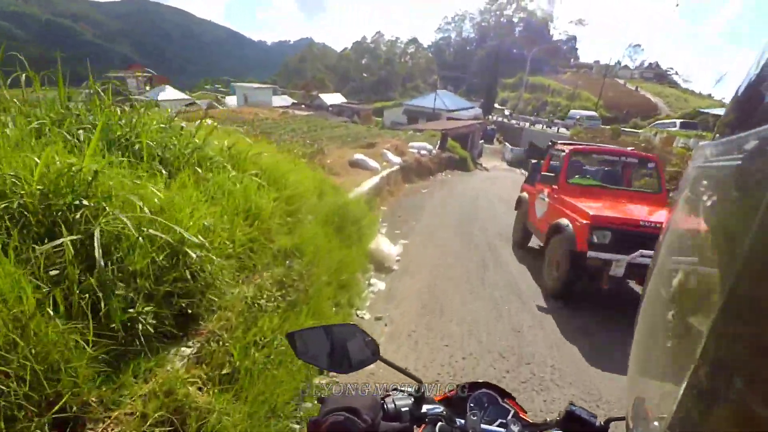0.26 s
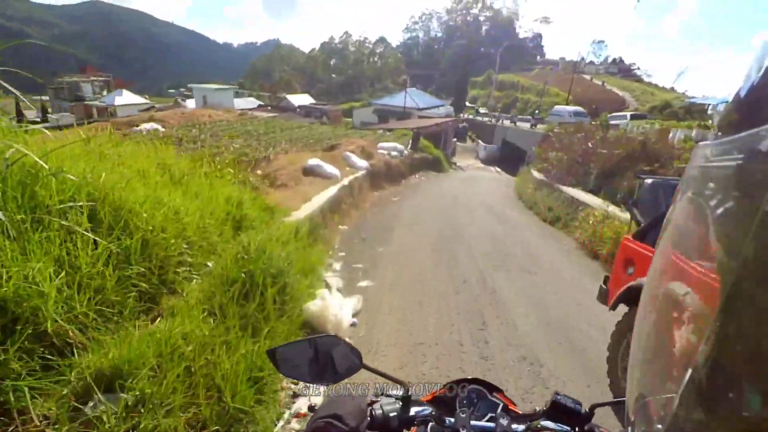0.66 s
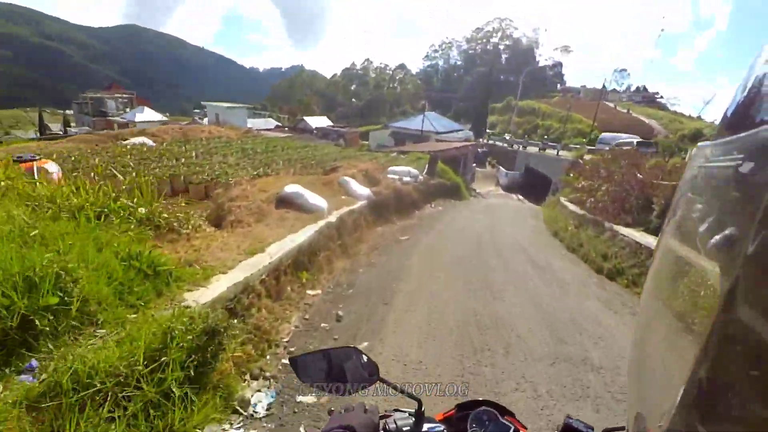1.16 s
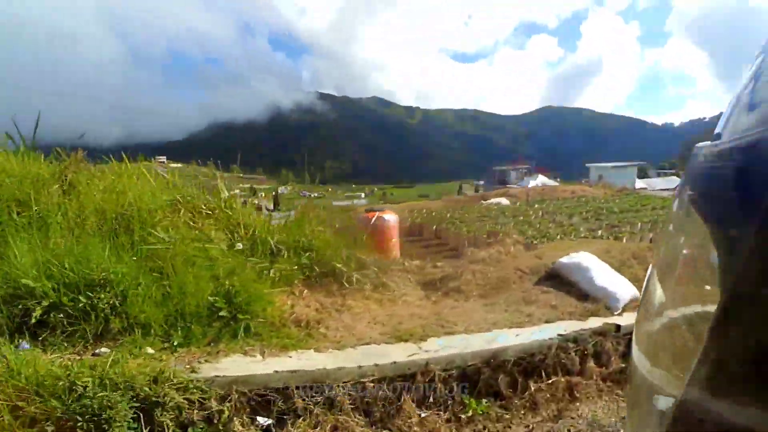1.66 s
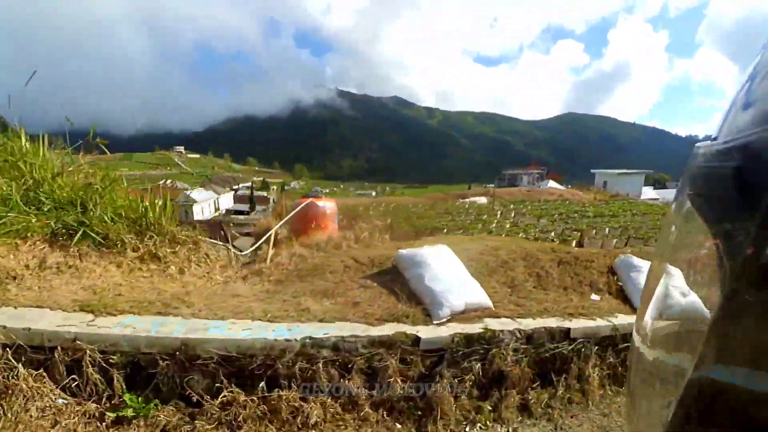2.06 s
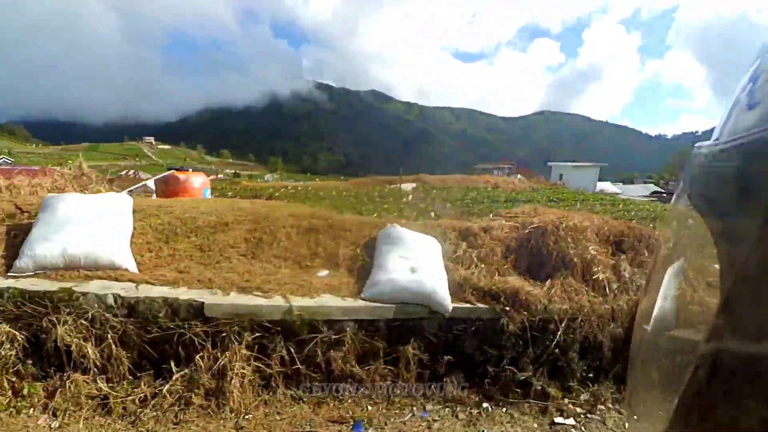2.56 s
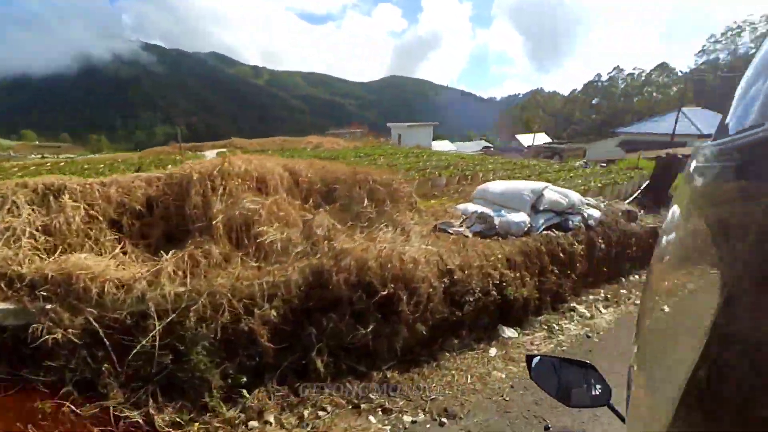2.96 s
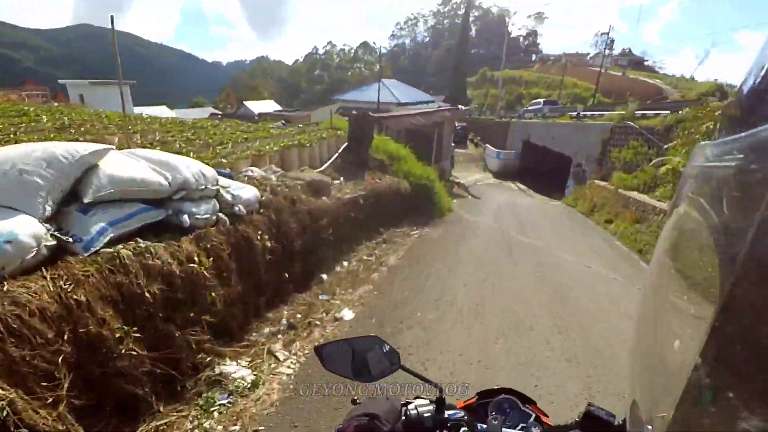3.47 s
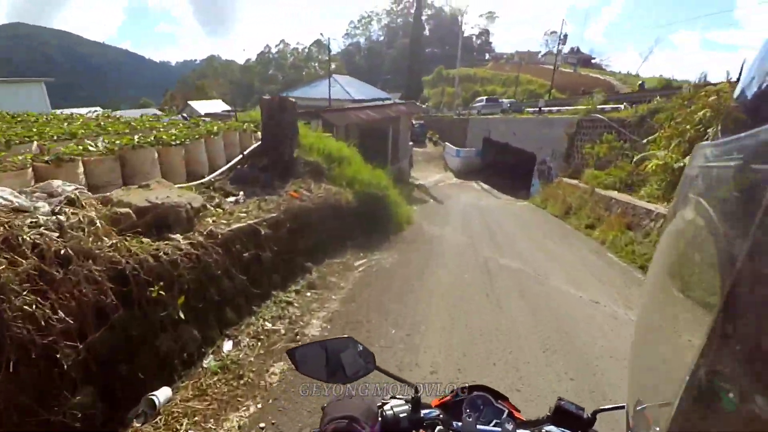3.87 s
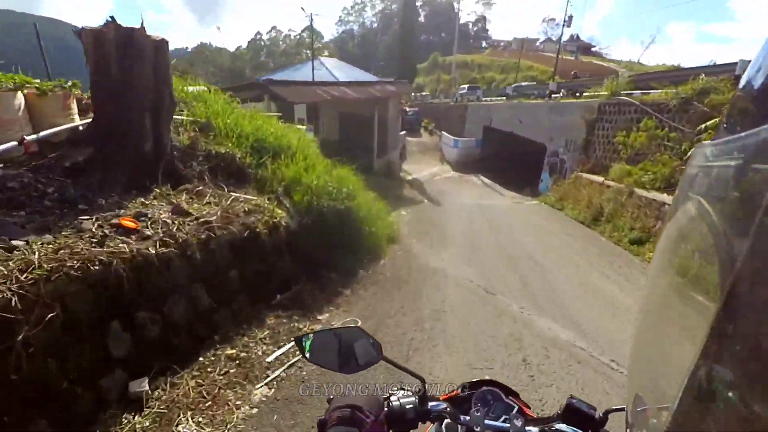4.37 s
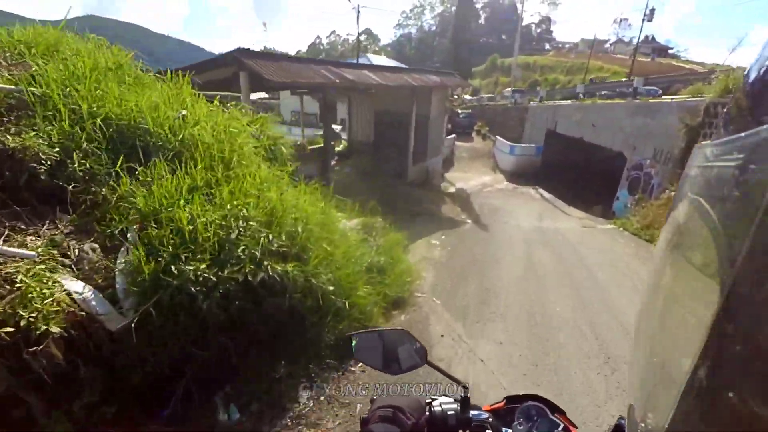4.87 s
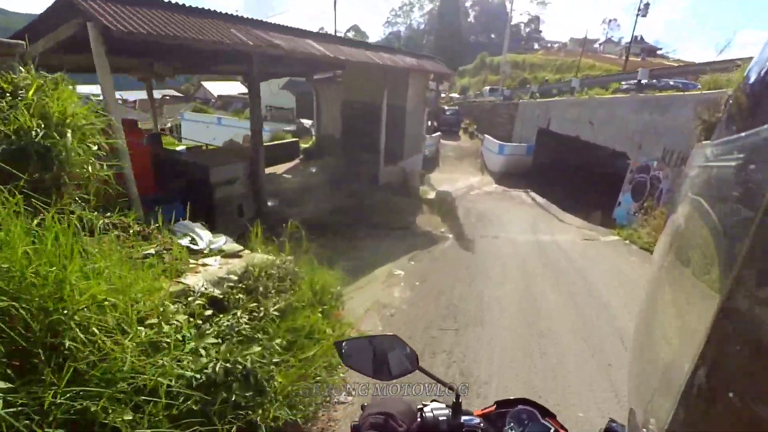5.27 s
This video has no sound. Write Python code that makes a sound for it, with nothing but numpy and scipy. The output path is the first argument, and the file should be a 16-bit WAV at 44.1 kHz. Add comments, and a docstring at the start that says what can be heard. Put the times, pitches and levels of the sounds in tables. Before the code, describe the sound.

From a rider's helmet: low single-cylinder putter, an off-road car rasping and hissing by within a second, then a fading engine drone and wind.

```python
"""Motorcycle ride past an off-road car

A single-cylinder motorcycle thumps slowly along a village road, heard from the rider's helmet.
A four-cylinder off-road car passes close by, with tyre hiss and grit, then drones away behind.
A second car hums faintly, air buffets the helmet, and stones tick and a brake chirps now and then.
Engines are sine waves and pulses that follow the engine speed; air, gas and tyres are shaped noise.
"""
import sys
import numpy as np
from scipy import signal
from scipy.fft import rfft, irfft, next_fast_len
from scipy.io import wavfile
from scipy.ndimage import uniform_filter1d, map_coordinates

SR = 44100
rng = np.random.default_rng(int(sys.argv[2]) if len(sys.argv) > 2 else 0)


def unload_wav(signal):
    """Save mono or channel-first audio to the path in sys.argv[1] as 16-bit WAV at rate SR, clipped to [-1, 1]."""
    wavfile.write(
        sys.argv[1],
        SR,
        np.round(np.clip(np.atleast_2d(signal).T, -1, 1) * 32767).astype(np.int16),
    )


N = 243564  # samples

# Every "swell" has the columns: hold_from_s, hold_until_s, level_db, rise_db_per_s, fall_db_per_s

# motorcycle engine speed: time_s, firings_per_s
BIKE_SPEED = [(0, 20.84), (.78, 20.84), (1.7, 21.8), (2.1, 22.15), (2.3, 21.77), (2.7, 21.23), (3.1, 20.64),
              (3.5, 21.11), (3.8, 21.32), (4.1, 22.21), (4.45, 22.03), (4.8, 20.75), (5.15, 20.22),
              (5.52, 19.59)]
# the rider looks aside and back: time_s, head_turn (0-1)
HEAD_TURN = [(1.5, 0), (2, 0.79), (3.1, 0.87), (3.4, 0.02)]
# the rider rolls off the throttle: time_s, closed (0-1)
THROTTLE_CLOSED = [(4.35, 0), (4.65, 0.6)]
# level of each motorcycle part: level_db at cruise, db_per_extra_firing_per_s, db_added_by_head_turn
THUMP_LAW = (-33.5, 0.079, -0.57)
CASE_LAW = (-41.5, 0.68, 2.1)
VALVE_LAW = (-68, 0.55, -2.3)
CRUISE_RATE = 21  # firings per s
# colour of the engine case noise: pitch_hz, level_db
CASE_COLOUR = [(40, -22.5), (80, 2), (140, 5), (200, -11), (300, -3.5), (450, -13), (620, -17.5),
               (800, -22.5), (1150, -28), (1600, -27.5), (2100, -33), (2500, -40), (4000, -61.5)]
# colour of the valve clatter: pitch_hz, level_db
VALVE_COLOUR = [(1600, -23.5), (2400, -5), (2900, -1), (3330, 2.5), (3750, -5), (5050, -3), (5550, -9),
                (6500, -7.5), (7600, -14.5), (9300, -15), (11500, -19.5), (15000, -28.5)]
# gear whine: multiple_of_firing_rate, level_db, db_added_by_head_turn, db_added_by_closed_throttle
GEARS = [(24.67, -65, -1, 4.5), (37.95, -71.5, 1, 5), (49.33, -73, 1, 5), (74, -74.5, 11, 1),
         (84.4, -82.5, -1, 8), (96.3, -80, 4, 0)]

# off-road car engine speed with its Doppler fall: time_s, firings_per_s
CAR_SPEED = [(0, 118.6), (.57, 118.7), (.8, 116), (1.04, 114.4), (1.2, 111), (1.47, 110), (1.83, 103.8),
             (2, 105), (2.14, 99), (2.36, 95.6), (2.52, 99.6), (2.72, 102), (2.92, 97.6), (3.2, 99.3),
             (3.42, 97.8), (4, 100), (4.25, 98.3), (4.45, 101.4), (5.52, 102)]
HARD_FIRING_S = .95  # the strongest cylinder fires at this time
ABREAST_S, GAP_M, CLOSING_M_PER_S = 0.81, 0.97, 5.6  # the tailpipe goes by
# exhaust note of the pass: multiple_of_firing_rate, then the swell columns
PASS_NOTE = [(1, .93, 1.05, -18.2, 60, 42), (2, .45, 1.28, -24.5, 20, 36), (3, 0, 1.37, -29.3, 0, 32)]
# reflections cancel a harmonic: multiple_of_firing_rate, time_s, depth_db, length_s
NULLS = [(2, .75, 17, .018), (2, .94, 4, .025), (2, 1.15, 14, .045), (2, 1.55, 5, .025), (3, .5, 15, .1),
         (3, 1.23, 8, .035), (3, 2.79, 10, .03), (3, 2.95, 9, .025), (4, 1.95, 11, .07), (4, 2.93, 6, .06)]
# lope of the engine: multiple_of_cycle_rate, level_db; then its swell
LOPE = [(7, -18), (10, 0), (11, -6.5), (13, -4), (14, -11.5), (15, -4)]
LOPE_SWELL = (0, 1.3, -45, 0, 30)
# unequal cylinders: share_of_cycle, level_db
CYLINDERS = [(0, 0), (.235, -2), (.48, -3), (.77, -4)]
# each tailpipe resonance is loudest from its own angle: pitch_hz, width_hz, then the swell columns
TAILPIPE = [(541, 88, 0.94, 1.15, -41.5, 2, 27), (669, 68, 1.1, 0.96, -42, 9, 30.5),
            (790, 64, 0.92, 1.27, -48.5, 26, 28.5), (709, 42, 1.276, 1.25, -41, 78.5, 42.5),
            (979, 79, 1.1, 1.33, -49.5, 12, 61)]
PIPE_NOISE = .5  # turbulent gas beside the pulses
# throb of the strongest cylinder: multiple_of_cycle_rate, level_db
THROB = [(18, -13), (19, -3.5), (20, 2)]
# overall throb level: time_s, level_db
THROB_LEVEL = [(0, -41), (.2, -35.5), (.35, -37.5), (.45, -42), (.6, -44), (.7, -37.5), (.85, -40.5),
               (1, -38), (1.15, -38.5), (1.33, -43), (1.4, -53), (1.52, -46.5), (1.85, -54), (2.2, -85)]
THROB_AT = .14  # share of the cycle at which it crests
# harmonics beside the throb that ring freely: multiple_of_cycle_rate, level_db
OVERTONES = [(16, -6), (18, -10), (22, -12), (23, -8.5), (24, -18), (27, -16)]
# the throb hardens to a crack: multiple_of_cycle_rate, level_db; then its swell
CRACK = [(20, -9), (21, -11), (22, -10), (23, 0), (24, -9), (25, -13), (26, -13), (27, -9)]
CRACK_SWELL = (.96, 1.13, -37.8, 110, 75)
# colours of the rasp, tyre hiss, grit and roar: pitch_hz, level_db
RASP_COLOUR = [(700, -31), (1100, -1.5), (1400, 3.5), (1750, -0.5), (2100, -2), (2450, -12.5),
               (2850, -20.5), (3500, -10), (4200, -22), (6000, -56.5)]
TYRE_COLOUR = [(1500, -15.5), (2800, 2.5), (3800, -5.5), (4800, -3), (5800, -7), (7000, -8), (9000, -17),
               (13000, -24)]
GRIT_COLOUR = [(5000, -16), (8500, -1), (10000, -4), (12500, -7.5), (15000, -9)]
ROAR_COLOUR = [(60, -20), (160, -8.5), (300, -3), (600, 0), (850, -11), (1300, -47), (2500, -75)]
# swells of the car's noises: the swell columns
RASP_SWELL = (.76, 1.05, -46.5, 11, 33)
TYRE_SWELL = (.55, .83, -52.5, 15, 22)
GRIT_SWELL = (.68, .84, -58.8, 22, 29)
ROAR_SWELL = (.45, .88, -35.3, 8, 19)
WHIRR_SWELL = (.3, .7, -57, 36, 26)
GROWL_SWELL = (2.7, 2.95, -58.5, 14, 30)
# a second, softer swish behind the car: the swell columns
SWISH_SWELL = (1.71, 1.78, -67, 110, 42)
SWISH_RASP_DB, SWISH_GRIT_DB, SWISH_MID_DB = 11, -3.5, 0  # relative to the swish's tyre hiss
# two bright bands of the rasp sink as the car leaves: time_s, pitch_hz, level_db
LOW_HOWL = [(.3, 1450, -68), (.6, 1420, -55), (1, 1480, -50), (1.13, 1350, -47.5), (1.21, 1130, -56),
            (1.3, 1010, -48.5), (1.42, 970, -49), (1.56, 940, -62), (2, 900, -90)]
HIGH_HOWL = [(0, 1700, -56), (.45, 1780, -54), (.85, 1800, -54), (1.04, 1850, -53), (1.13, 1620, -52),
             (1.25, 1560, -57), (1.45, 1300, -63), (1.9, 1200, -90)]
HOWL_WIDTH_HZ, WHIRR_WIDTH_HZ = 70, 160
# the car pulls away under load: time_s, effort_db
PULL = [(1.75, -53.5), (1.98, -39.5), (2.06, -56), (2.15, -39.5), (2.65, -44.5), (3, -46.5), (3.5, -42),
        (4.22, -46), (4.45, -52), (4.8, -52.5), (5.5, -64.5)]
PULL_FROM_S = 2.15  # distance losses count from the car's place at this time
# low harmonics: multiple_of_firing_rate, db_over_effort, loss_db_per_doubling_of_distance, flutter_db
PULL_NOTE = [(2, -7, 5, 2.5), (3, 1.5, 4, 2), (4, .7, 0, .8), (5, -16, -2, 3)]
# upper harmonics: multiple_of_firing_rate, level_db
DRONE = [(6, 2), (6.25, -4.5), (6.5, -6), (6.75, -6.5), (7, -11.5), (8, -10.5), (9, -13.5), (9.5, -14.5),
         (10, -12.5), (12, -17.5), (12.5, -18), (12.75, -18)]
DRONE_DB, DRONE_FOLLOWS = -40.5, 0.4  # base level; dB per dB of effort
# tilt of the upper harmonics: time_s, db_per_octave
DRONE_TILT = [(2.35, 5), (2.85, 8), (3.6, -6.5), (5.5, -12)]

# second car: time_s, firings_per_s, level_db
SECOND_CAR = [(0, 98, -29), (.12, 91, -32), (.28, 102, -30.5), (.56, 108.6, -33.5), (.72, 97, -35),
              (1.2, 99, -40.5), (1.7, 101, -52)]
# its harmonics 1 to 4: level_db
SECOND_CAR_HARMONICS = [2.5, -3.0, -5.0, -14.0]

# larger stones tick under the tyres: time_s, level_db
STONES = [(1.12, -54), (1.148, -55), (1.158, -57), (1.168, -62), (1.215, -59), (1.262, -62), (1.299, -61),
          (1.379, -59), (1.477, -71), (3.894, -70)]
STONE_HZ, STONE_WIDTH_HZ, STONE_S = 6800, 1000, 0.004
# the tread flings up small stones: the swell columns
SPRAY_SWELL = (1.08, 1.28, -62.5, 45, 38)
# brake chirps, before a shared delay and cut: time_s, level_db
CHIRPS = [(2.35, -70), (2.515, -76), (2.591, -66), (2.675, -68), (3.005, -66), (4.65, -65), (4.727, -66),
          (4.89, -74), (4.98, -71), (5.05, -72)]
CHIRP_HZ, CHIRP_SCATTER_HZ, CHIRP_S = 9170, 50, 0.0087
# a clink and a thin puff of hiss: time_s, level_db, pitch_hz, width_hz, length_s
CLINK = (3.192, -60.5, 4680, 220, .003)
HISS = (5.32, -71.5, 13700, 978, .036)

# colour of the wind: pitch_hz, level_db
WIND_COLOUR = [(4, -1), (12, 10), (25, 0), (45, -2.5), (100, -6), (200, -31), (500, -67.5), (2000, -120)]
WIND_DB, WIND_TURNED_DB = -35, 5.5  # facing ahead; added by a full head turn
TOP_HZ = 15300


def motorcycle():
    """Exhaust thumps, case noise, valve clatter and gear whine all follow one turning shaft."""
    rate, = curves(BIKE_SPEED)
    turned, = curves(HEAD_TURN)
    turns = np.cumsum(rate) / SR

    def level(db, per_rate, aside):
        """Gain that depends on engine speed and on the way the head faces."""
        return amp(db + per_rate * (rate - CRUISE_RATE) + aside * turned)

    exhaust = level(*THUMP_LAW) * thumps(turns, push_hz=81.8, push_s=0.004, ring_hz=109.4,
                                         ring_t60=0.21, ring_share=0.48, scatter_db=1.5)
    case_pulse = 1 + 0.31 * gate(turns, at=0.082, sharp=0.8)
    case = level(*CASE_LAW) * unit(noise(CASE_COLOUR) * case_pulse)
    # three taps per firing cycle
    taps = gate(turns, at=0.15, sharp=11)
    taps = taps + 0.7 * gate(turns, at=0.31, sharp=40) + 0.7 * gate(turns, at=0.94, sharp=90)
    clatter = 1 + 0.45 * taps * amp(2.5 * wobble(37))
    valves = level(*VALVE_LAW) * unit(noise(VALVE_COLOUR) * clatter)
    return exhaust + case + valves + gear_whine(turns, turned)


def thumps(turns, push_hz, push_s, ring_hz, ring_t60, ring_share, scatter_db):
    """Each firing is one pressure push, after which the silencer rings."""
    t = np.arange(-SR // 5, SR // 5 + 1) / SR
    push = np.cos(2 * np.pi * push_hz * t) * np.exp(-np.abs(t) / push_s)
    after = np.maximum(t, 0)
    ring_envelope = amp(-60 * after / ring_t60) * (1 - np.exp(-after / 0.003))
    ring = np.cos(2 * np.pi * ring_hz * t) * ring_envelope
    shape = uniform_filter1d(push + ring_share * ring, size=80)  # softens the edges
    return unit(signal.fftconvolve(firings(turns, scatter_db), shape, "same"))


def gear_whine(turns, turned):
    """Tones at fixed multiples of the firing rate change with the head turn and the throttle."""
    closed, = curves(THROTTLE_CLOSED)
    return sum(amp(db + aside * turned + overrun * closed) * partial(turns, order, flutter_db=1.8, drift=.06)
               for order, db, aside, overrun in GEARS)


def offroad_car():
    """One crankshaft drives the exhaust note, the close bark and the distant drone."""
    turns = np.cumsum(curves(CAR_SPEED)[0]) / SR
    turns = turns - turns[round(HARD_FIRING_S * SR)]  # counted from a firing of the strongest cylinder
    return car_exhaust(turns) + car_pass(turns) + car_drone(turns)


def car_exhaust(turns):
    """Firing harmonics swell, break up and fade; the lowest booms only beside the tailpipe."""
    return sum(swell(*shape) * nulls(order) * partial(turns, order, flutter_db=1.2, drift=0.03)
               * amp(.8 * wobble(110))
               for order, *shape in PASS_NOTE)


def car_pass(turns):
    """Close by, the tailpipe barks and rasps and the tyres roar and hiss."""
    cycle = turns / 4  # four firings make one full engine cycle
    swish = swell(*SWISH_SWELL)
    lope = swell(*LOPE_SWELL) * sum(amp(db) * partial(cycle, order, flutter_db=7.0, drift=0.077)
                                    for order, db in LOPE)
    puffs = (1 + 0.67 * gate(turns, at=0.42, sharp=3.5)) * (1 + 0.21 * gate(cycle, at=0.1, sharp=1.0))
    rasp = (swell(*RASP_SWELL) + amp(SWISH_RASP_DB) * swish) * unit(noise(RASP_COLOUR) * puffs)
    tyres = np.hypot(swell(*TYRE_SWELL), swish) * unit(noise(TYRE_COLOUR) * amp(2.0 * wobble(350)))
    crunch = unit(noise(GRIT_COLOUR) * amp(2.2 * wobble(500)))  # the tread crunches in tiny spurts
    grit = np.hypot(swell(*GRIT_SWELL), amp(SWISH_GRIT_DB) * swish) * crunch
    roar = swell(*ROAR_SWELL) * unit(noise(ROAR_COLOUR) * puffs)
    whirr_noise = band(centre_hz=2870, width_hz=WHIRR_WIDTH_HZ) + 0.28 * band(centre_hz=4800, width_hz=370)
    whirr = swell(*WHIRR_SWELL) * whirr_noise
    hush = amp(SWISH_MID_DB) * swish * band(centre_hz=3850, width_hz=720)
    engine = lope + bark(cycle) + rasp + howl(LOW_HOWL) + howl(HIGH_HOWL)
    return engine + tyres + grit + roar + whirr + hush


def bark(cycle):
    """Uneven pulses and turbulent gas ring the tailpipe; the strongest cylinder throbs and cracks."""
    pulses = sum(amp(db) * firings(cycle - at, scatter_db=3) for at, db in CYLINDERS)
    gas = unit(pulses) + PIPE_NOISE * rng.standard_normal(N)

    def ring(hz, width):
        """The gas through one resonance, applied twice."""
        return unit(filtered(gas, lambda f: (1j * f * width / (hz * hz - f * f + 1j * f * width)) ** 2))

    pipe = 0
    for k, (hz, width, *shape) in enumerate(TAILPIPE):
        shimmer = amp(2.2 * wobble(70))  # turbulence in the pipe
        pipe = pipe + (-1) ** k * swell(*shape) * shimmer * ring(hz, width)
    return pipe + throb(cycle)


def throb(cycle):
    """Neighbouring harmonics crest together once a cycle: a soft throb, or a crack when close."""
    turns = cycle - THROB_AT
    offset = rng.random() + .04 * wobble(14)

    def burst(harmonics):
        """Harmonics that share one phase, so that their crests meet."""
        return np.sqrt(2) * sum(amp(db + wobble(25)) * np.cos(2 * np.pi * (order * turns + offset))
                                for order, db in harmonics)

    free = sum(amp(db) * partial(cycle, order, flutter_db=2.5, drift=.1) for order, db in OVERTONES)
    return amp(curves(THROB_LEVEL)[0]) * (burst(THROB) + free) + swell(*CRACK_SWELL) * burst(CRACK)


def howl(path):
    """A narrow band of noise glides in pitch along its path."""
    hz, db = curves(path)
    angle = 2 * np.pi * np.cumsum(hz) / SR
    # slow noise carried by a tone makes a narrow band around that tone
    carried = band(0, HOWL_WIDTH_HZ) * np.cos(angle) + band(0, HOWL_WIDTH_HZ) * np.sin(angle)
    return amp(db) * unit(carried)


def car_drone(turns):
    """One effort drives low and upper harmonics; distance weighs on the low, a tilt on the upper."""
    pull_db, = curves(PULL)
    relative_distance = distance(np.arange(N) / SR) / distance(PULL_FROM_S)
    doublings = np.maximum(np.log2(relative_distance), 0)
    note = sum(amp(pull_db + db - loss * doublings) * nulls(order)
               * partial(turns, order, flutter_db, drift=0.033)
               for order, db, loss, flutter_db in PULL_NOTE)
    tilt_db, = curves(DRONE_TILT)
    upper_db = DRONE_DB + DRONE_FOLLOWS * pull_db
    upper = sum(amp(upper_db + db + tilt_db * np.log2(order / DRONE[0][0]))
                * partial(turns, order, flutter_db=2.5, drift=.07)
                for order, db in DRONE)
    growl = unit(band(centre_hz=1110, width_hz=400) * (1 + gate(turns, at=0.49, sharp=1.4)))
    return note + upper + swell(*GROWL_SWELL) * growl


def distance(t):
    """The car's tailpipe from the rider, in units of the closest gap."""
    return np.hypot(1, CLOSING_M_PER_S * (t - ABREAST_S) / GAP_M)


def nulls(order):
    """The gain of one harmonic as reflections briefly cancel it."""
    return amp(-sum(depth * blip(s, length) for k, s, depth, length in NULLS if k == order))


def second_car():
    """Four harmonics of a lower engine note beat against the first car's."""
    rate, db = curves(SECOND_CAR)
    turns = np.cumsum(rate) / SR
    return sum(amp(db + harmonic_db) * partial(turns, order, flutter_db=1.5, drift=0.029)
               for order, harmonic_db in enumerate(SECOND_CAR_HARMONICS, start=1))


def stones():
    """Stones tick and spray as short or swelling bursts of crackly high noise."""
    ticks = band(STONE_HZ, STONE_WIDTH_HZ) * sum(amp(db) * blip(s, STONE_S) for s, db in STONES)
    spray_noise = unit(band(centre_hz=7000, width_hz=1500) * amp(5 * wobble(420)))
    return crackle() * ticks + swell(*SPRAY_SWELL) * spray_noise


def brake_chirps():
    """Each chirp is a brief, thin tone with a slightly shaky pitch."""
    t = np.arange(N) / SR
    flutter = .2 * wobble(250)
    pitches = CHIRP_HZ + CHIRP_SCATTER_HZ * rng.standard_normal(len(CHIRPS))
    return sum(amp(db - 4.5) * blip(s + .004, CHIRP_S) * np.sin(2 * np.pi * (hz * t + flutter))
               for (s, db), hz in zip(CHIRPS, pitches))


def clink_and_hiss():
    """A lone clink and a puff of hiss are brief, crackly bands of noise."""
    return crackle() * sum(amp(db) * blip(s, length) * band(hz, width)
                           for s, db, hz, width, length in (CLINK, HISS))


def wind():
    """Slow air buffets the helmet, harder when it is turned across the flow."""
    turned, = curves(HEAD_TURN)
    gusts = unit(noise(WIND_COLOUR) * amp(0.94 * wobble(9.6)))
    return amp(WIND_DB + WIND_TURNED_DB * turned) * gusts


def firings(turns, scatter_db):
    """One impulse a turn, each of slightly different strength."""
    at = np.flatnonzero(np.diff(np.floor(turns)) > 0)
    return np.bincount(at, amp(scatter_db * rng.standard_normal(len(at))), N)


def partial(turns, order, flutter_db, drift):
    """One engine harmonic, unsteady in level and phase."""
    phase = order * turns + rng.random() + drift * wobble(14)
    return np.sqrt(2) * amp(flutter_db * wobble(11)) * np.sin(2 * np.pi * phase)


def gate(turns, at, sharp):
    """A bump once a turn, at a given share of it."""
    return np.exp(sharp * (np.cos(2 * np.pi * (turns - at)) - 1))


def crackle():
    """A fast, uneven gain of rms 1."""
    return unit(amp(3.5 * wobble(450)))


def swell(start, end, db, rise, fall):
    """A gain that rises, holds from start to end and fades, in dB per s."""
    t = np.arange(N) / SR
    return amp(db - abs(rise) * np.maximum(start - t, 0) - abs(fall) * np.maximum(t - end, 0))


def blip(s, length):
    """A brief bell-shaped envelope."""
    return np.exp(-((np.arange(N) / SR - s) / length) ** 2 / 2)


def noise(colour):
    """Noise of rms 1 whose loudness at each pitch follows the colour."""
    f, db = np.transpose(colour)
    return unit(filtered(rng.standard_normal(N), lambda hz: amp(np.interp(np.log(hz + 1), np.log(f), db))))


def band(centre_hz, width_hz):
    """A bell-shaped band of noise of rms 1."""
    return unit(filtered(rng.standard_normal(N), lambda hz: np.exp(-((hz - centre_hz) / (2 * width_hz)) ** 2)))


def filtered(x, response):
    """Scale each frequency of x by a response."""
    m = next_fast_len(N + SR // 2)
    return irfft(rfft(x, m) * response(np.fft.rfftfreq(m, 1 / SR)), m)[..., :N]


def wobble(rate):
    """A smooth random curve with so many random points a second."""
    points = rng.standard_normal(int(N * rate / SR) + 4)
    return map_coordinates(points, [np.arange(N) * rate / SR])


def curves(rows):
    """One value per sample for each column after the time."""
    s, *cols = np.transpose(rows)
    return [np.interp(np.arange(N) / SR, s, c) for c in cols]


def amp(db):
    """Decibels to gain."""
    return 10 ** (np.asarray(db) / 20)


def unit(x):
    """Scale to rms 1."""
    return x / np.sqrt(np.mean(x ** 2) + 1e-20)


def scene():
    """All sources add up to one signal that feeds both channels."""
    vehicles = motorcycle() + offroad_car() + second_car()
    mono = vehicles + stones() + brake_chirps() + clink_and_hiss() + wind()
    return np.array([mono, mono])


def record(dry):
    """Nothing passes above the band limit; the sound starts and ends softly."""
    edges = signal.windows.tukey(N, .002)
    return filtered(dry * edges, lambda hz: hz < TOP_HZ)


dry = scene()
out = record(dry)
unload_wav(out)
```